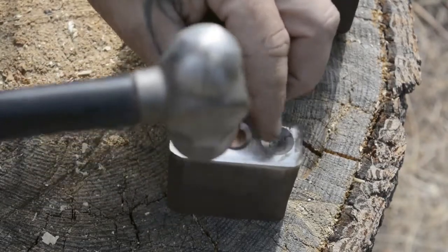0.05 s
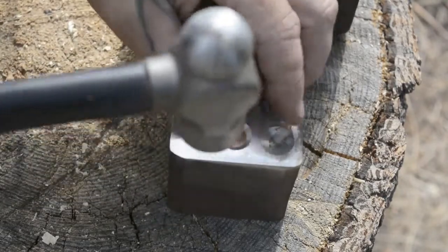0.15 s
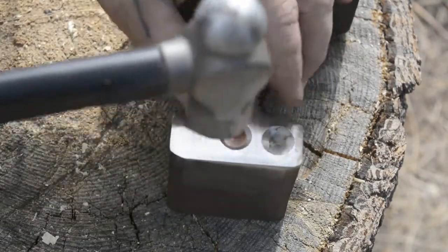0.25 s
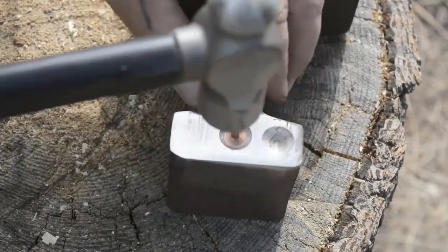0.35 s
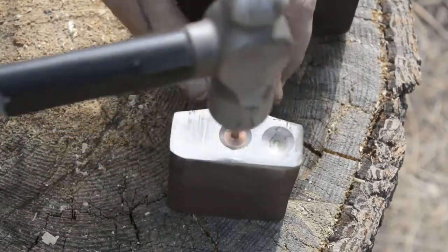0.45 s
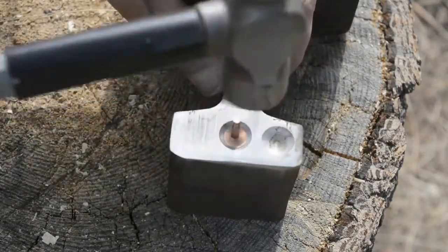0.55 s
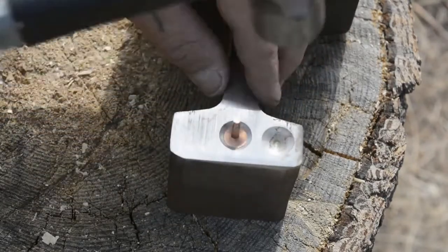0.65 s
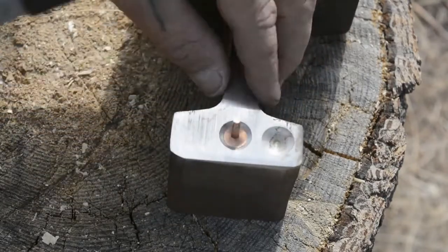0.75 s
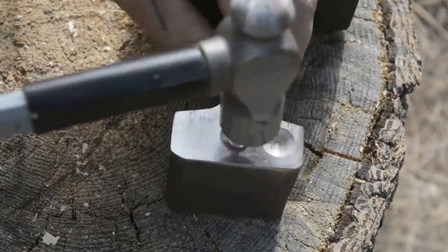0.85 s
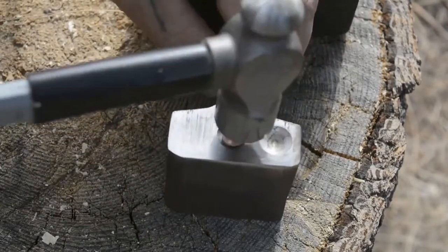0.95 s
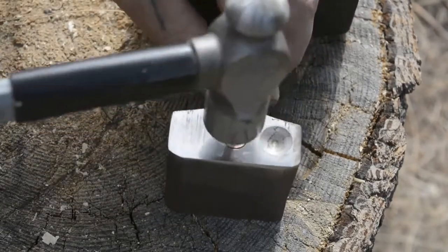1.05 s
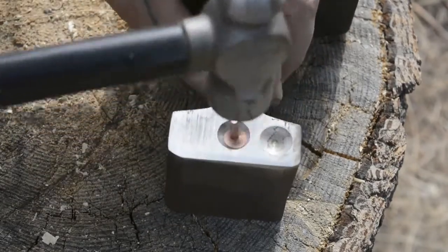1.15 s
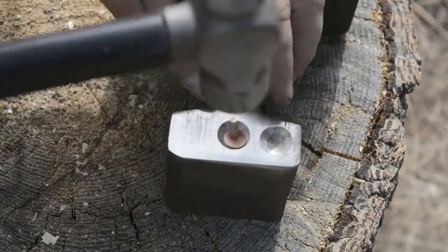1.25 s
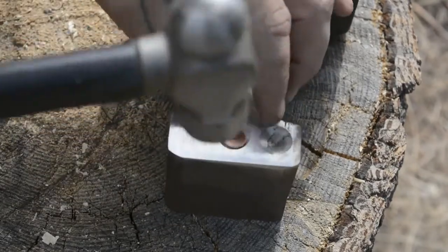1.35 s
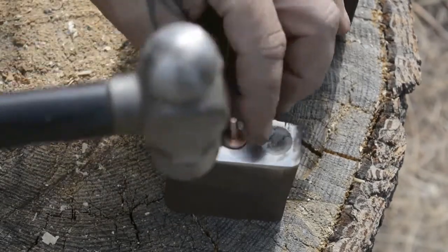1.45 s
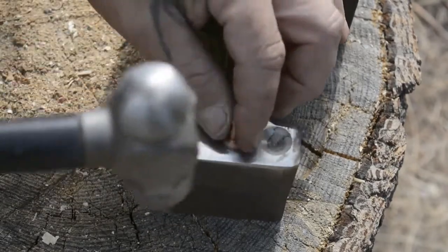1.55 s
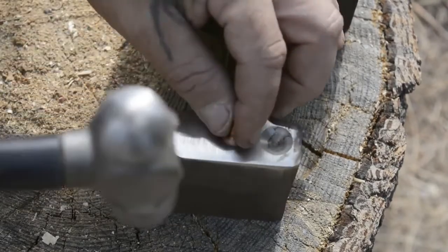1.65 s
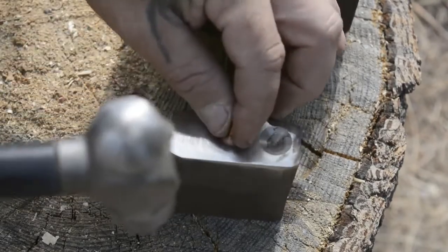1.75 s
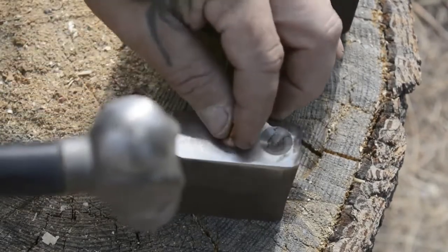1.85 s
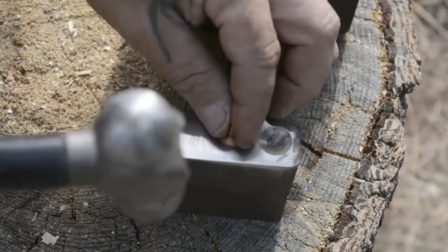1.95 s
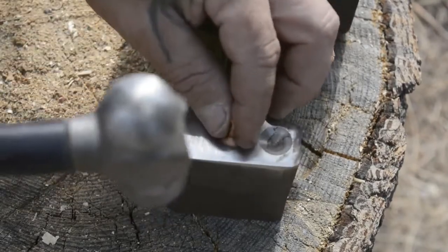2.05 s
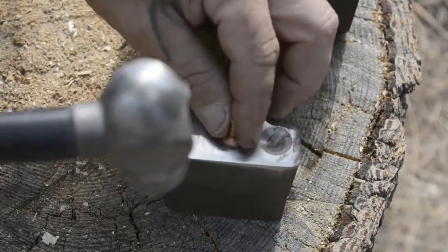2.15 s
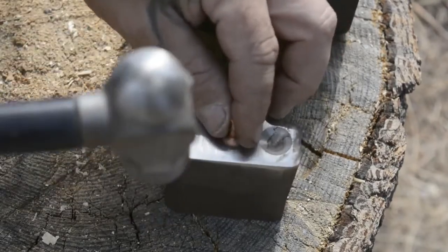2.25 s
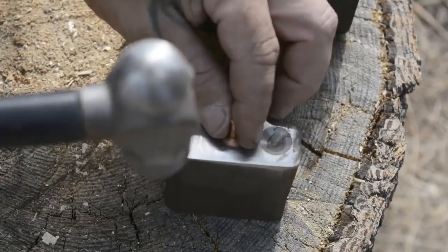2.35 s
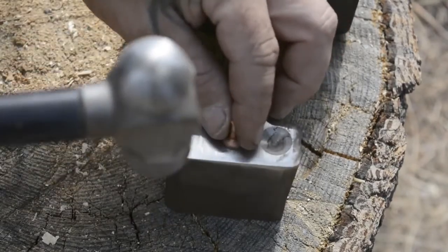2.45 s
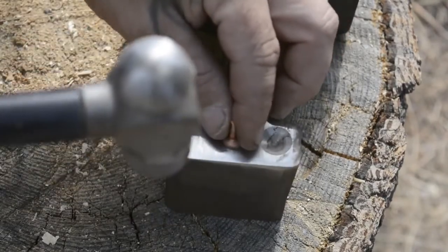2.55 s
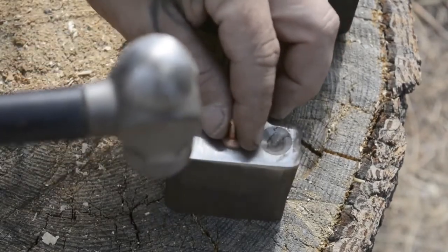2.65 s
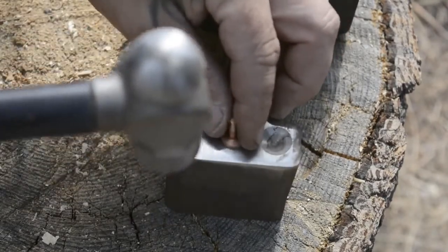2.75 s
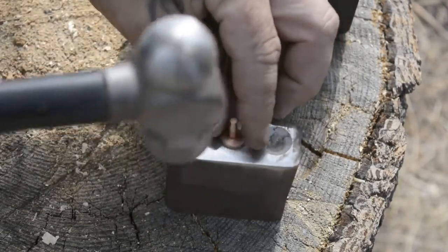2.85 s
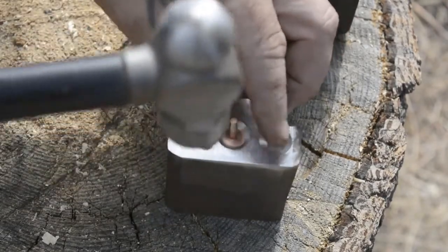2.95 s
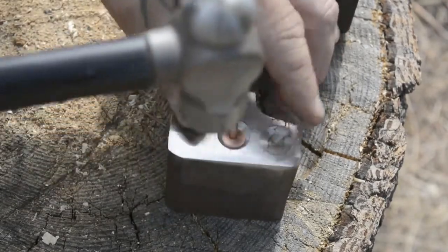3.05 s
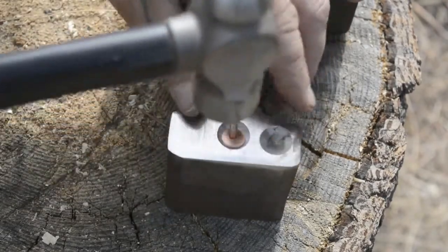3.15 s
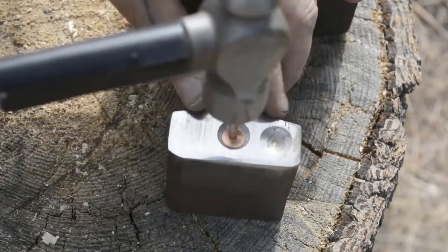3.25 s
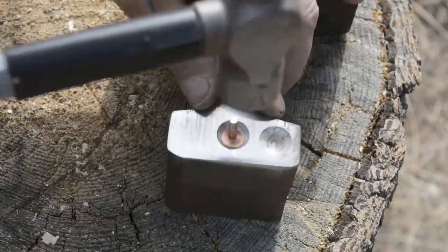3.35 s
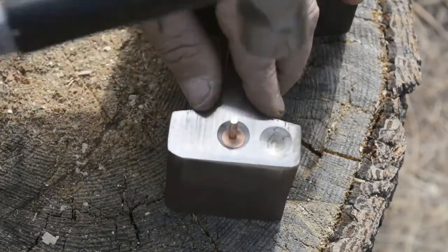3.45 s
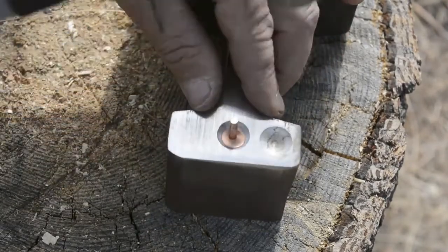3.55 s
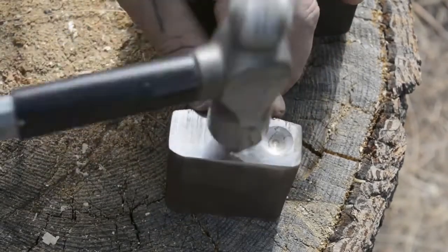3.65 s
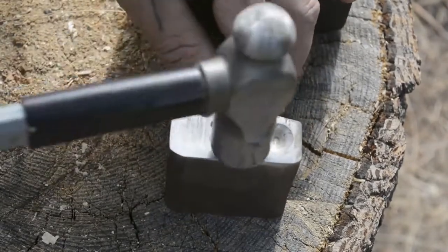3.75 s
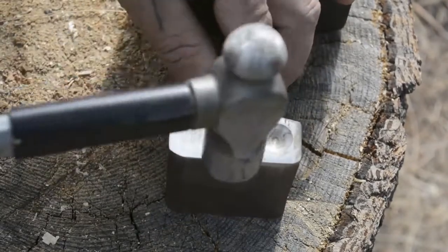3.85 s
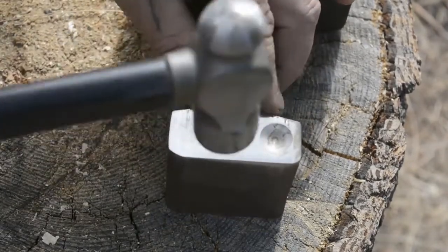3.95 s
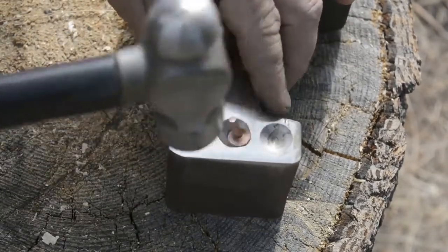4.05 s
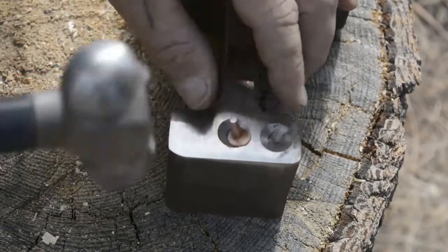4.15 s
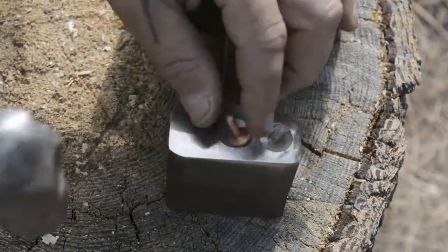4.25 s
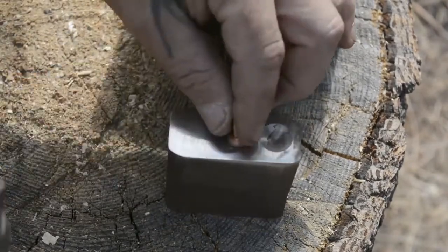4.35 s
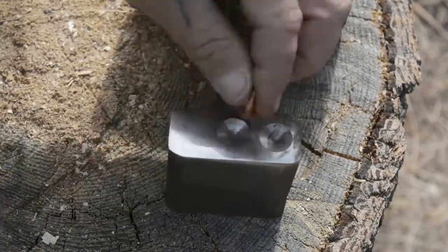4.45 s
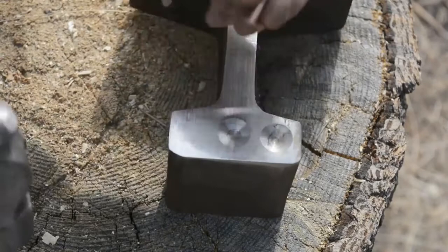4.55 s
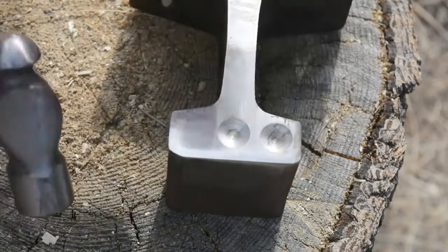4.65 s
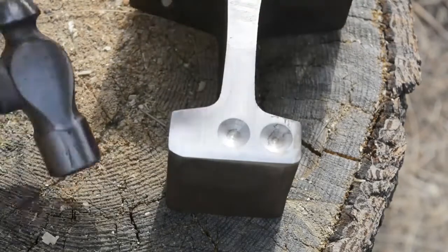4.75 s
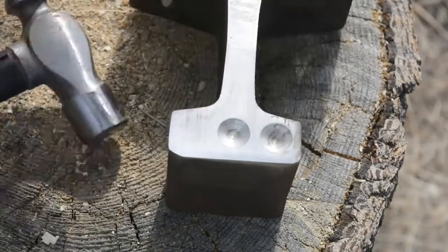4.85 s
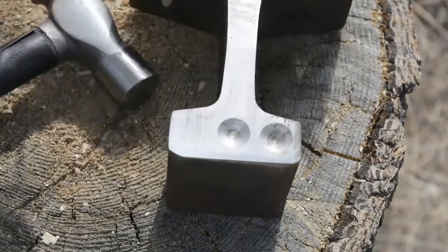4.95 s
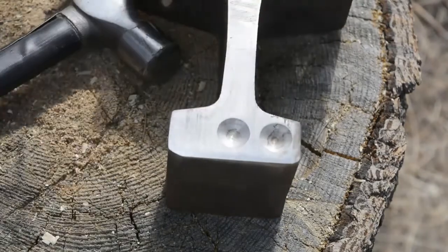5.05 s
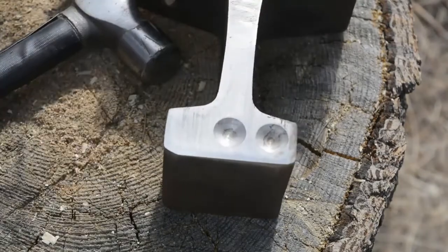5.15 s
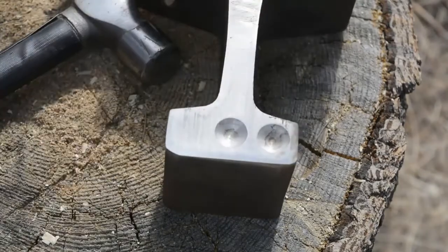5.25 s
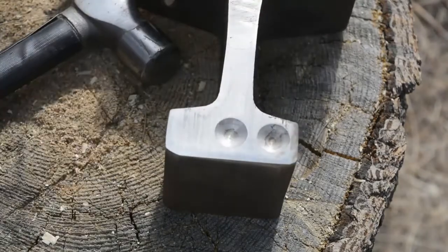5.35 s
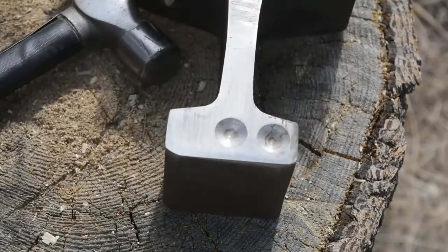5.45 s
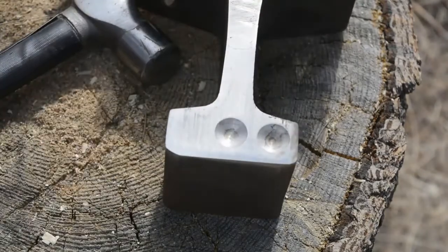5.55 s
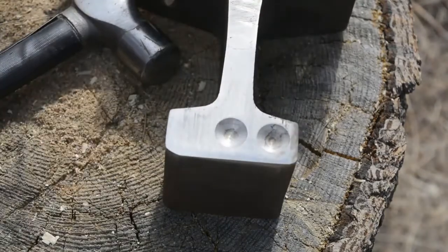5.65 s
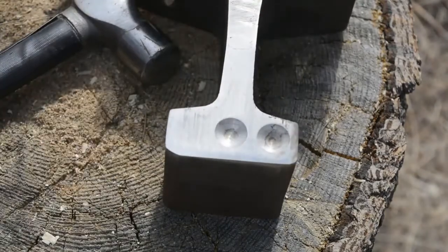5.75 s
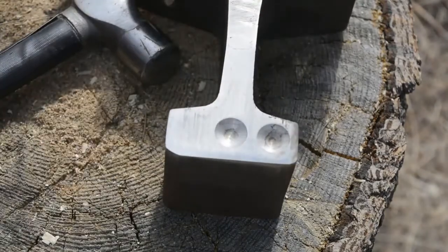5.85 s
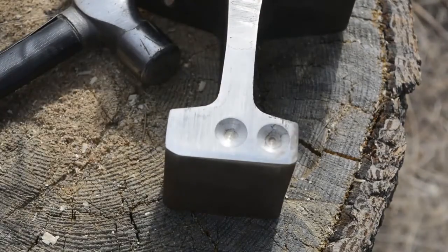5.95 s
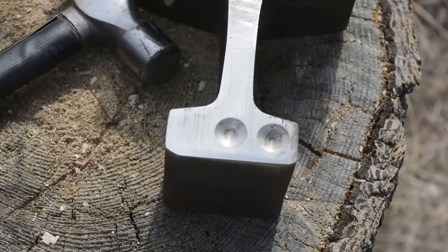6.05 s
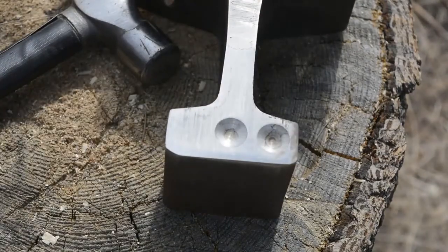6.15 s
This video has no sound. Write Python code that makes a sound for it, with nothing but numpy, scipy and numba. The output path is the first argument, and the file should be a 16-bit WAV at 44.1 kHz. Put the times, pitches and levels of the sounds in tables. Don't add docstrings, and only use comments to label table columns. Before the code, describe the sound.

Quiet countryside with soft wind puffs and small-camera hiss. A short falling bird whistle comes just before a hammer strikes a rivet on a steel block: sharp crack, woody thud, brief ring, quick rattle of bounces. A distant machine drones faintly, a light tap, then a second similar blow. After another drone, the hammer is laid against steel, ringing and wavering, with finger taps on wood and thin leaf rustle.

```python
import sys
import numpy as np
from scipy import signal
from scipy.fft import rfft, irfft
from scipy.io import wavfile
from numba import njit

SR = 44100
rng = np.random.default_rng(int(sys.argv[2]) if len(sys.argv) > 2 else 0)


def rack_gain(trim_db):
    fader = np.asarray(trim_db, float)
    return 10 ** (fader / 20)


def wrap_up_sound(samples):
    columns = np.atleast_2d(samples).T
    tamed = np.clip(columns, -1, 1)
    steps = np.round(tamed * 32767).astype(np.int16)
    wavfile.write(sys.argv[1], SR, steps)


N = 273420
T = np.arange(N) / SR
MS = T * 1000
SPLASH = 600

# frequency in Hz, level in dB per Hz.
AIR = [(26, -16), (45, -0.5), (126, 0), (210, -7.5), (238, -4), (289, -7), (335, -8), (648, -8.5),
       (1290, -12.5), (1450, -13), (1770, -13), (2490, -16), (15600, -17)]
# frequency in Hz, side minus mid in dB.
AIR_SIDE = [(60, -18), (110, -13), (200, -11), (380, -7), (700, -8.5), (1290, -6), (2380, -5), (4400, 17),
            (8120, 2), (15000, -5.5)]
AIR_DB = -55.5

# time in seconds, peak level in dB.
GUSTS = [(0.0, -58), (.36, -52.5), (.7, -63), (.84, -58), (1.33, -61), (1.82, -57), (2.26, -61),
         (2.47, -59), (2.88, -60), (3.12, -66), (3.3, -51), (3.51, -62), (3.68, -46), (3.84, -58),
         (4.3, -59), (4.82, -57), (5.53, -50.5), (5.81, -57), (6.06, -60)]
GUST_RISE_S, GUST_FALL_S, CALM_DB = 0.026, 0.046, -63.5

# start in seconds, end in seconds, pitch in Hz, level in dB.
DRONES = [
    (1.83, 2.34, 142.2, -61.5),
    (4.843, 5.42, 143.4, -61),
]
DRONE_PARTIALS_DB = [1.5, -4, -13, -8]

# time in seconds, level in dB.
RUSTLE = [
    (5.35, -72),
    (5.498, -66),
    (5.592, -56.5),
    (5.86, -55.5),
    (5.918, -47.5),
    (5.972, -61),
    (6.2, -59),
]
# frequency in Hz, level in dB.
RUSTLE_COLOUR = [(5000, -17), (10000, -14), (12500, -5), (13750, 1), (14500, -4), (16000, -9)]

# time in seconds, pitch in Hz, level in dB.
BIRD = [
    (.55, 2060, -71),
    (.574, 2020, -63),
    (0.601, 1680, -57.5),
    (0.63, 1570, -64),
    (.68, 1450, -54),
    (0.718, 1410, -51),
    (.755, 1308, -56.5),
    (.805, 960, -61),
    (.829, 900, -78),
]
OCTAVE_EVEN_S, OCTAVE_DB_PER_S = 0.63, 201

STRIKES_S = [
    0.8517,
    3.6688,
    5.0715,
]
BLOWS_DB = [1, 1]
SHAKE_DB, SHAKE_T60_S, SHAKE_LOW_HZ, SHAKE_HIGH_HZ = -22.5, 0.081, 252, 1500

# time in seconds, level in dB, pitch in Hz, t60 in seconds.
TAPS = [(2.325, -31, 695, 0.0049), (2.352, -47, 410, .05), (5.0716, -12, 950, 0.0042),
        (5.0718, -34, 720, 0.059), (5.074, -35, 1410, 0.031), (5.1389, -27, 690, 0.0065),
        (5.141, -34, 500, 0.022), (5.545, -35.5, 880, 0.0064), (5.5734, -23, 540, 0.0046),
        (5.577, -40.5, 267, 0.026), (5.575, -37.5, 118, 0.068), (5.331, -47, 332, 0.037),
        (5.419, -45, 310, 0.026), (5.518, -43, 303, 0.034), (5.651, -50, 318, 0.056),
        (5.701, -56, 480, 0.099), (5.608, -37, 600, 0.0054), (5.748, -21.5, 746, 0.0029),
        (5.749, -33, 360, 0.016), (5.738, -37, 900, .008), (5.816, -41, 650, 0.0087)]

# centre in Hz, width in Hz, fade in ms, then level in dB for each full blow.
CLASH = [(11000, 2700, 0.38, -13, -21), (5540, 1100, 0.49, -13, -10.5), (2860, 500, 0.79, -23.5, -54),
         (4360, 1100, 0.44, -18, -22), (8000, 3800, 0.86, -21, -12.5)]
# time in seconds, level in dB, centre in Hz.
PINGS = [(0.863, -36, 4500), (0.885, -34, 10600), (0.8885, -28, 12200), (0.899, -19, 12800),
         (0.909, -45, 11500), (0.933, -45, 12000), (0.9495, -42, 12500), (0.959, -29, 12200),
         (3.68, -45, 5000), (3.7115, -33, 3480), (3.713, -33, 10200), (3.724, -29, 6160),
         (3.741, -39, 10500), (3.747, -40, 3600), (5.071, -37.5, 3220), (5.14, -49, 8000),
         (5.545, -44, 2500)]
PING_WIDTH_HZ, PING_WIDTH_SHARE, PING_FADE_MS = 1000, 0.08, 0.6
# time in seconds, level in dB, centre in Hz.
SLAPS = [
    (0.8945, -33, 8350),
    (0.927, -32, 8000),
    (3.7165, -41, 7500),
    (3.723, -29, 7000),
    (3.7265, -28.5, 11000),
    (3.739, -38, 7500),
    (5.814, -40, 7400),
]
SLAP_WIDTH_HZ, SLAP_FADE_MS = 7000, 0.7

# pitch in Hz, t60 in seconds, level in dB.
STUMP = [(213, 0.098, -25), (372, 0.017, 3.5), (500, 0.016, 9.5), (652, 0.016, 9), (786, 0.044, 5.5),
         (1116, 0.025, 4), (1240, 0.012, 10), (1410, 0.015, 3), (1715, 0.09, -28), (1930, 0.035, -28),
         (1530, 0.011, -6), (2630, 0.034, -24)]
# time in seconds, peak level in dB, contact in ms.
KNOCKS = [(0.888, -23, 1), (0.8945, -22, 0.99), (0.9016, -12, 0.95), (0.911, -21, 0.99),
          (0.9247, -17.5, 0.75), (0.932, -16.5, 1.7), (0.9456, -23.5, 0.45), (0.954, -23.5, 2.2),
          (0.9605, -32, 4.1), (0.971, -40, 1.1), (0.979, -39.5, 1.1), (3.7095, -13, 0.66),
          (3.7145, -20.5, 1.5), (3.7195, -30, 0.76), (3.724, -30, 0.88), (3.728, -20, 3), (3.74, -39, 0.98),
          (3.746, -30, 0.22), (3.752, -48, 0.76), (3.77, -45, 1.1)]
BOUNCE_HZ, SETTLE_S, DAMPING, DAMPING_PER_MS = 725, 0.11, 1.1, 0.39
CHATTER_COUNT, CHATTER_S, CHATTER_DB, CHATTER_MS = 2, 0.007, -12, 0.45

STEEL_HZ = [1711.7, 2297, 2294.9, 4705.5, 5986, 7192, 7971, 9583, 11596]
# t60 in seconds, bend of the decay (no unit), then level in dB at each strike.
STEEL = [(0.88, 1.16, -49, -38.5, -90), (0.59, 1.24, -28.5, -28.5, -75), (3.1, 1, -68, -65, -48),
         (0.38, 2.16, -50, -59, -53.5), (0.42, 2.6, -50.5, -55.5, -56.5), (0.31, 2.26, -41.5, -45, -70),
         (0.43, 1.7, -68, -69, -53.5), (0.38, 1.7, -54.5, -65, -80), (0.57, 1.8, -70, -57.5, -83)]
RING_SHARE = [0.85, 0.82, 1.13]
# time in seconds, facing from -1 to 1.
ROLL = [
    (5.07, .99),
    (5.3, .56),
    (5.41, .42),
    (5.495, 0),
    (5.58, -.58),
    (5.7, -.52),
    (5.79, -.8),
    (5.9, -.43),
    (6.2, -.4),
]
ROLL_HZ, ROLL_T60_S, ROLL_DB = 1711.1, 2.0, -31

WHINE_HZ, WHINE_DB = 13730, -76
TOP_HZ = 15690


def colour(points):
    hz, db = np.transpose(points)
    f = np.maximum(np.fft.rfftfreq(N, 1 / SR), 1)
    gain = rack_gain(np.interp(np.log(f), np.log(hz), db, left=-60))
    x = irfft(rfft(rng.standard_normal(N)) * gain, N)
    return x / x.std()


def add(out, s, x):
    i = int(s * SR)
    out[..., i:i + x.shape[-1]] += x[..., :N - i]


def ring(hz, t60, db, seconds, sign=1, bend=1):
    t = T[:int(seconds * SR), None]
    decay = np.exp(-np.log(1000) * (t / t60) ** bend)
    return (sign * rack_gain(db) * decay * np.cos(2 * np.pi * hz * t)).sum(axis=1)


def air():
    hz, db = np.transpose(AIR)
    side_hz, side_db = np.transpose(AIR_SIDE)
    mid = colour(AIR[:-1])
    wide = db + np.interp(np.log(hz), np.log(side_hz), side_db)
    side = rack_gain(-6.0) * colour(np.transpose([hz, wide])[:-1])
    return rack_gain(AIR_DB + 2.2) * np.array([mid + side, mid - side])


def wind():
    level = rack_gain(CALM_DB)
    for s, db in GUSTS:
        slope = np.where(T < s, GUST_RISE_S, GUST_FALL_S)
        level = level + rack_gain(db) * np.exp(-((T - s) / slope) ** 2)
    return level * colour([(12, -2.5), (26, -13.5), (50, -13.5), (90, -18), (200, -67)])


def drone():
    out = np.zeros(N)
    waver = colour([(1, -10.0), (12, 1.0), (14, -70)])
    for start, end, hz, db in DRONES:
        phase = 2 * np.pi * np.cumsum(hz * (1 + 0.011 * waver)) / SR
        gate = np.clip(np.minimum(T - start, end - T) / 0.028, 0, 1)
        buzz = sum(rack_gain(p) * np.sin((k + 1) * phase) for k, p in enumerate(DRONE_PARTIALS_DB))
        out += gate * rack_gain(db + 1.36 * waver) * buzz
    return out


def rustle():
    s, db = np.transpose(RUSTLE)
    grain_db = 0.54 * colour([(20, 7), (200, 9), (250, -76)])
    level = rack_gain(np.interp(T, s, db, left=-90) + grain_db)
    mid = colour(RUSTLE_COLOUR)
    side = rack_gain(-38) * colour(RUSTLE_COLOUR)
    return level * np.array([mid + side, mid - side])


def bird():
    s, hz, db = np.transpose(BIRD)
    phase = 2 * np.pi * np.cumsum(np.interp(T, s, hz)) / SR
    octave = rack_gain(np.clip(OCTAVE_DB_PER_S * (T - OCTAVE_EVEN_S), -40, 40))
    whistle = (np.sin(phase) + octave * np.sin(2 * phase)) / np.hypot(1, octave)
    return rack_gain(np.interp(T, s, db, left=-150, right=-150)) * whistle


def shake():
    out = np.zeros(N)
    t = T[:SR // 8]
    sos = signal.butter(4, [SHAKE_LOW_HZ, SHAKE_HIGH_HZ], "band", fs=SR, output="sos")
    for s, db in zip(STRIKES_S, BLOWS_DB):
        x = signal.sosfilt(sos, rng.standard_normal(len(t)))
        level = rack_gain(db + SHAKE_DB - 60 * t / SHAKE_T60_S)
        add(out, s, x / x.std() * level * (1 - np.exp(-t / 0.00051)))
    return out


def taps():
    out = np.zeros(N)
    for s, db, hz, t60 in TAPS:
        x = -ring(hz, t60, db, 0.12)
        add(out, s, x * (1 - np.exp(-MS[:len(x)] * hz / 250)))
    return out


def cracks():
    out = np.zeros((2, N))
    t = MS[:SPLASH]
    rows = []
    for k, s in enumerate(STRIKES_S[:2]):
        rows += [(s, dbs[k], hz, width, fade) for hz, width, fade, *dbs in CLASH]
    rows += [(s, db, hz, PING_WIDTH_HZ + PING_WIDTH_SHARE * hz, PING_FADE_MS) for s, db, hz in PINGS]
    rows += [(*row, SLAP_WIDTH_HZ, SLAP_FADE_MS) for row in SLAPS]
    for s, db, hz, width_hz, fade_ms in rows:
        band = [max(hz - width_hz / 2, 300), min(hz + width_hz / 2, 19000)]
        sos = signal.butter(2, band, "band", fs=SR, output="sos")
        burst = rng.standard_normal((2, SPLASH)) * (1 - np.exp(-t / 0.66)) * np.exp(-t / fade_ms)
        mid, side = signal.sosfilt(sos, burst)
        side = rack_gain(-29) * side
        add(out, s, np.array([mid + side, mid - side]) * rack_gain(db) / np.abs(mid).max())
    return out


def knock(hz, t60, gain_db, sign, contact_ms, peak_db):
    push = np.sin(np.pi * np.clip(MS[:SPLASH] / contact_ms, 0, 1)) ** 2
    x = ring(hz, t60, gain_db, 0.12, sign)
    x = np.convolve(x * (1 - np.exp(-MS[:len(x)] / 0.62)), push)
    return x * rack_gain(peak_db) / np.abs(x).max()


def stump():
    out = np.zeros(N)
    hz, t60, mode_db = np.transpose(STUMP)
    for s, db in zip(STRIKES_S, BLOWS_DB):
        add(out, s, knock(hz, t60, mode_db, 1, 0.14, db))
    touches = list(KNOCKS)
    for s, db, _ in KNOCKS:
        for late in rng.random(CHATTER_COUNT):
            touches.append((s + CHATTER_S * late, db + CHATTER_DB, CHATTER_MS))
    for s, db, contact_ms in touches:
        shift, favour, flip = rng.standard_normal((3, len(STUMP)))
        since = s - max(blow for blow in STRIKES_S if blow < s)
        centre_hz = BOUNCE_HZ * np.exp(-(since / SETTLE_S) ** 2)
        favour_db = 0.5 * mode_db - 1.06 * np.log2(hz / centre_hz) ** 2 + 4.5 * favour
        damped_t60 = t60 / (DAMPING + DAMPING_PER_MS * contact_ms)
        add(out, s, knock(hz * (1 + 0.092 * shift), damped_t60, favour_db, np.sign(flip), contact_ms, db))
    return signal.sosfilt(signal.butter(2, 150, "high", fs=SR, output="sos"), out)


def steel():
    out = np.zeros(N)
    t60, bend, *dbs = np.transpose(STEEL)
    for s, db, share in zip(STRIKES_S, dbs, RING_SHARE):
        x = ring(np.array(STEEL_HZ), t60 * share, db, 1.2, 1, bend)
        add(out, s, x * (1 - np.exp(-MS[:len(x)] / 0.95)))
    x = ring(ROLL_HZ, ROLL_T60_S, ROLL_DB, 1.2)
    facing = np.interp(STRIKES_S[-1] + T[:len(x)], *np.transpose(ROLL))
    add(out, STRIKES_S[-1], x * facing * (1 - np.exp(-MS[:len(x)] / 0.65)))
    return out


def scene():
    background = air() + wind() + drone() + rustle() + bird()
    return background + shake() + taps() + cracks() + stump() + steel()


@njit
def follow(x, attack, release):
    out, e = np.empty(len(x)), 0.
    for i in range(len(x)):
        e += (x[i] - e) * (attack if x[i] > e else release)
        out[i] = e
    return out


def top_cut(x):
    return signal.sosfilt(signal.butter(12, 17000, fs=SR, output="sos"), x)


def record(dry):
    dry = dry + rack_gain(WHINE_DB) * np.sin(2 * np.pi * WHINE_HZ * T)
    loud = follow(np.abs(dry).max(axis=0), 1 / (0.00093 * SR), 1 / (0.16 * SR))
    gain = np.maximum(loud / rack_gain(-15), 1) ** -0.45
    wet = np.tanh(dry * gain) / 0.88
    wet = signal.sosfilt(signal.ellip(12, 0.2, 65, TOP_HZ, fs=SR, output="sos"), wet)
    return top_cut(wet)


dry = scene()
out = record(dry)
wrap_up_sound(out)
```